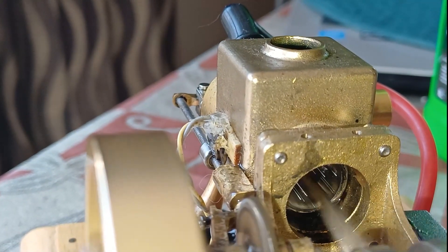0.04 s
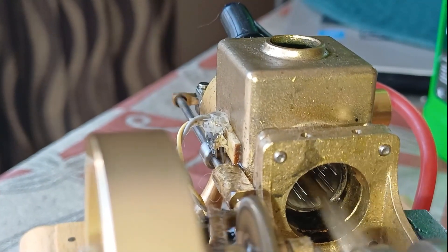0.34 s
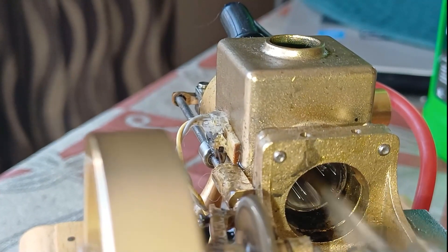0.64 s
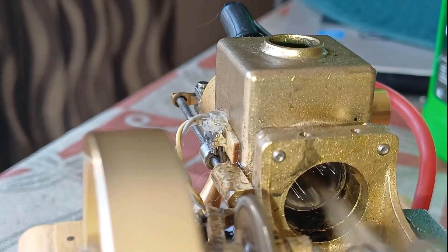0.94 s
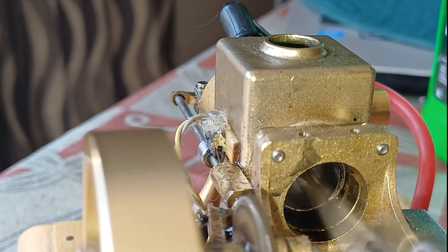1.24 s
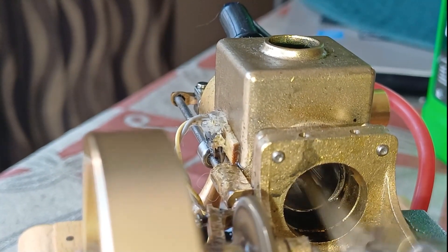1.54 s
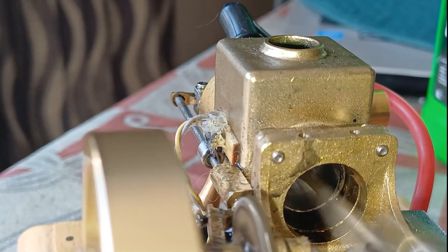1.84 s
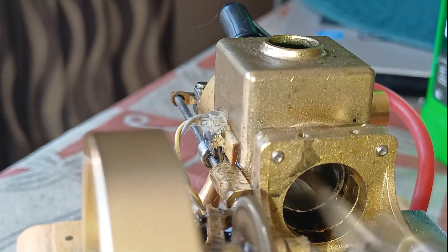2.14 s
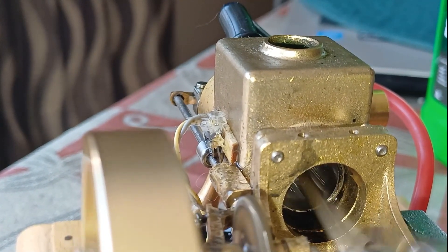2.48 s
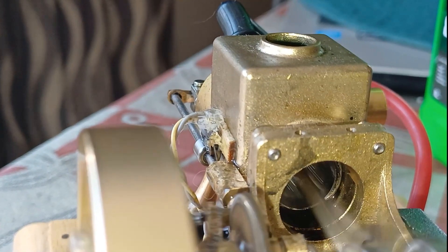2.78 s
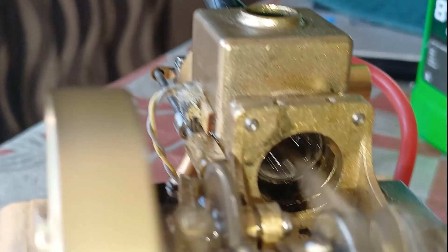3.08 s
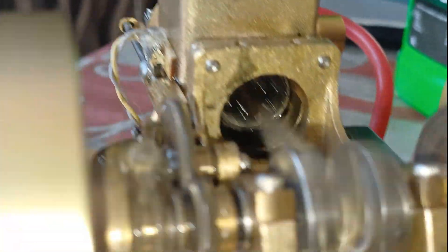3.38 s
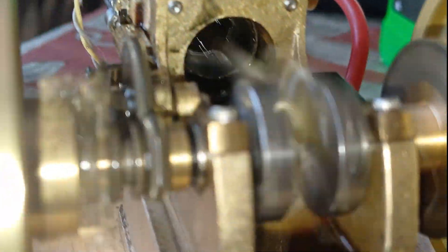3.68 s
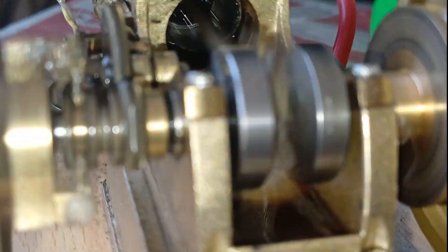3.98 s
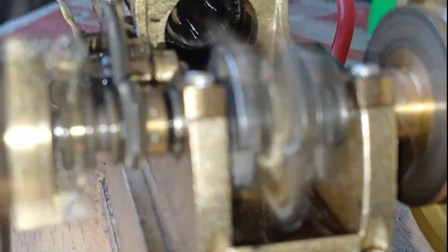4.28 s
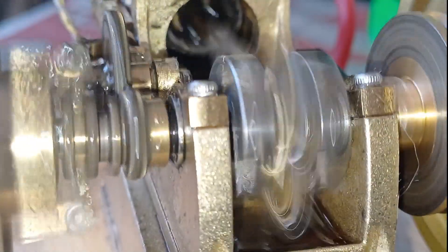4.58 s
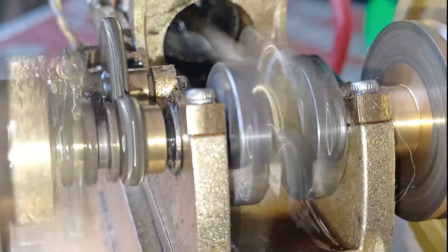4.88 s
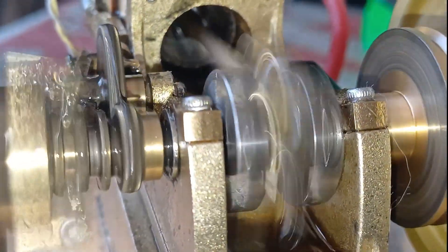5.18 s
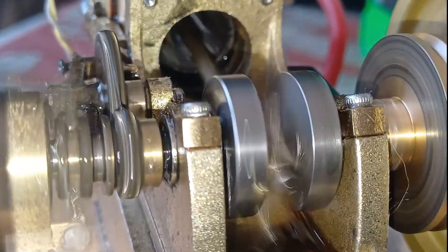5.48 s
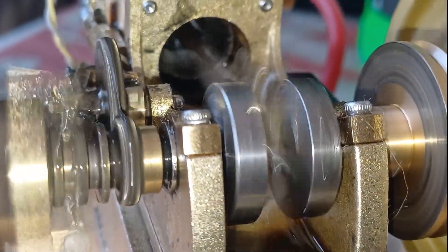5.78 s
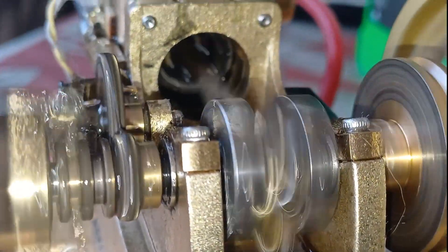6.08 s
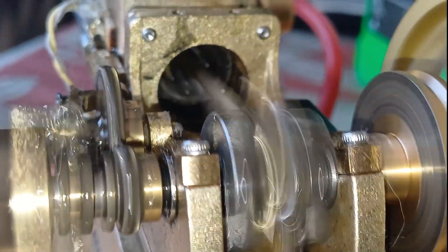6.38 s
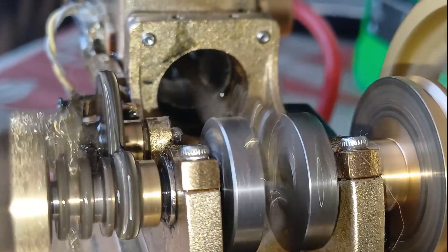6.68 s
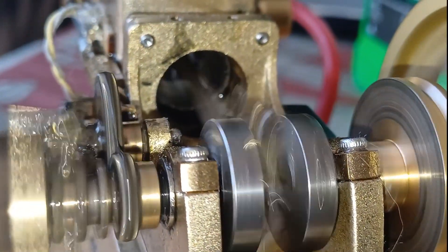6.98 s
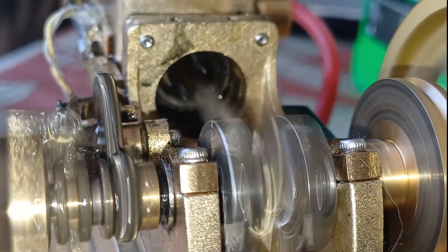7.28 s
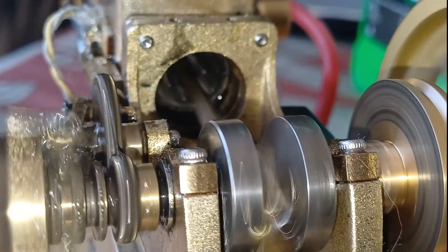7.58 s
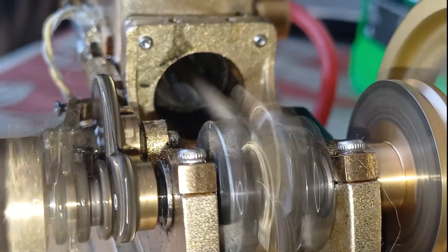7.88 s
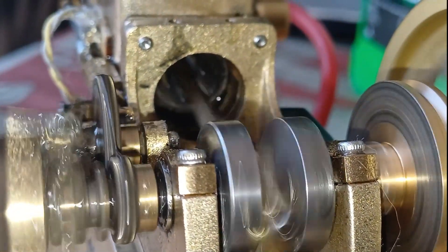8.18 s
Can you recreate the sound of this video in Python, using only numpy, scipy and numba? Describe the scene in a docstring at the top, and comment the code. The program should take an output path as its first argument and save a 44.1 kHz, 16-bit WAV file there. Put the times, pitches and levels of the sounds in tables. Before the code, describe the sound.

Sharp exhaust pops, each a thump with a hissy edge, come from a small model engine at slightly uneven gaps of about half a second. A tiny fluttering snort comes just before each one. Quick ticking, light metal knocking and a pulsing hiss fill the gaps, easing as the flywheel slows. The engine keeps this up throughout, heard very close in a small room with faint background air and one soft passing rush.

```python
"""A small room: a little brass hit-and-miss engine runs on a table, a hand's width away.
It fires once every five to seven four-stroke cycles. In between it coasts and slows: the piston hisses,
the cylinder hums, the rod knocks, the pushrod clicks on its latch. Then the exhaust valve shuts, the
intake valve snores, and one charge lights and pops out of the muffler.
Faint room air lies underneath; a soft rush swells and fades once."""
import sys
import numpy as np
from scipy import signal
from scipy.fft import rfft, irfft, next_fast_len
from scipy.io import wavfile
from numba import njit

SR = 44100
rng = np.random.default_rng(int(sys.argv[2]) if len(sys.argv) > 2 else 0)


def to_wav(s):
    """Save 16-bit WAV."""
    ch = np.atleast_2d(s).T  # columns
    pcm = np.round(np.clip(ch, -1, 1) * 32767)  # PCM
    wavfile.write(sys.argv[1], SR, pcm.astype(np.int16))


N = 367779
TIME = np.arange(N) / SR
SOFT_TAP_PHASE, SHUT_PHASE, TOP_CENTRE_PHASE = .077, .23, .3  # cycles after the exhaust opens
IGNITION_SHARE, PUSH_SHARE = .755, .9  # of the lead: the time from exhaust valve shut to pop


def undb(db):
    """Decibels to gain."""
    return 10 ** (np.asarray(db) / 20)


def unit(x):
    """Scale to rms 1."""
    return x / np.sqrt(np.mean(x ** 2))


def unit_hit(x):
    """Scale to the energy of 5 ms at rms 1."""
    return x / np.sqrt(np.mean(np.sum(x ** 2, axis=-1)) / (.005 * SR))


def bin_gains(points, size):
    """FFT bin gains of a (Hz, dB) curve."""
    hz, db = np.transpose(points)
    return undb(np.interp(np.log(np.fft.rfftfreq(size, 1 / SR) + 1), np.log(hz), db))


def colour(x, points, size=2048):
    """Minimum-phase filter with a (Hz, dB) curve."""
    cepstrum = irfft(np.log(bin_gains(points, size)))
    cepstrum[1:size // 2] *= 2
    cepstrum[size // 2 + 1:] = 0
    response = irfft(np.exp(rfft(cepstrum)))
    return signal.oaconvolve(np.atleast_2d(x), response[None], axes=1)[:, :x.shape[-1]]


def ring(x, response):
    """Convolve with an impulse response."""
    return signal.oaconvolve(np.atleast_2d(x), np.atleast_2d(response), axes=1)[:, :N]


def fade(t60_s, count=4096):
    """Exponential decay."""
    return undb(-60 * np.arange(count) / SR / t60_s)


def burst(t60_s, count=4096):
    """Decaying noise."""
    return rng.standard_normal(count) * fade(t60_s, count)


def modes(table, count=2048):
    """Decaying sines from (Hz, t60 s, dB) rows."""
    t = np.arange(count) / SR
    return sum(undb(db) * np.sin(2 * np.pi * hz * t) * fade(t60_s, count) for hz, t60_s, db in table)


def place(times_s, levels_db, sound):
    """A fresh sound() at each time; one level for all, or one each."""
    out = np.zeros(N)
    for at_s, db in zip(times_s, np.broadcast_to(levels_db, len(times_s))):
        start = int(at_s * SR)
        if 0 <= start < N:
            piece = sound()[:N - start]
            out[start:start + len(piece)] += undb(db) * piece
    return out


def contact(t60_s, chatter):
    """One impact, then brief surface chatter; energy 1."""
    force = chatter * burst(t60_s, 512)
    force[0] += 1
    return force / np.sqrt(np.sum(force ** 2))


@njit
def bandpass(x, hz, width_hz):
    """State-variable band-pass with a moving centre."""
    out, band_state, low_state = np.empty(len(x)), 0., 0.
    for i in range(len(x)):
        gain, damping = np.tan(np.pi * hz[i] / SR), width_hz / hz[i]
        band = (band_state + gain * (x[i] - low_state)) / (1 + gain * (gain + damping))
        band_state = 2 * band - band_state
        low_state += 2 * gain * band
        out[i] = damping * band
    return out


# Stereo balance of the engine. Each row: frequency in Hz, left minus right in dB.
BALANCE = [(200, 0.5), (750, -3.5), (1300, -2.5), (2500, 8), (4200, 1.5), (5800, -8), (8000, 4),
           (11000, 6.5), (15000, 7.5)]
def stereo(x, lag_s=0.00012):
    """The channels face different sides of the engine; left is nearer."""
    count = x.shape[-1]
    size = 2 * next_fast_len(count // 2 + 1024, True)
    side = np.sqrt(bin_gains(BALANCE, size))
    delay = np.exp(-2j * np.pi * np.fft.rfftfreq(size, 1 / SR) * lag_s)
    return irfft(rfft(x, size) * np.array([side, delay / side]), size)[:, :count]


def crank(cycle_s=.096, pop_before_s=-.345, pop_after_s=8.717):
    """Phase in four-stroke cycles: each firing speeds the flywheel up, then it slows until the next."""
    pop_s, lead_s, slowing_pct = np.transpose(FIRINGS)[:3]
    pop_s = np.r_[pop_before_s, pop_s, pop_after_s]
    lead_s = np.r_[lead_s, lead_s.mean()]
    slowing = np.r_[slowing_pct.mean(), slowing_pct] / 100
    times, phases, done = [], [], 0
    for start, end, lead, rate in zip(pop_s, pop_s[1:], lead_s, slowing):
        cycles = round((end - start) / cycle_s)
        coast = np.linspace(0, cycles - 1 + SHUT_PHASE, 200)
        times.append(start + (end - lead - start) * np.expm1(rate * coast) / np.expm1(rate * coast[-1]))
        phases.append(done + coast)
        done += cycles
    return np.interp(TIME, np.concatenate(times), np.concatenate(phases))


def when(phase, targets):
    """Seconds at which the crank reaches each target phase; -1 if never."""
    return np.interp(targets, phase, TIME, left=-1, right=-1)


# Spectra of the room air and the rush. Each row: frequency in Hz, level in dB.
AIR_SPECTRUM = [(20, -40), (50, -7.5), (110, -2.5), (300, -10), (450, -22), (1500, -23), (8000, -53)]
RUSH_SPECTRUM = [(70, -17), (130, -9), (330, 2), (550, -1), (780, 5), (1150, -10), (1550, -6), (1920, 2.5),
                 (2500, -10), (16000, -31)]
def room_air(air_db=-64.5, rush_db=-39.5, peak_s=3.705, rise_s=0.68, fall_s=0.27, floor_db=-19.5):
    """Faint low air; a soft rush swells, then sinks to a floor."""
    air, rush = (rng.standard_normal(N) + .5 * rng.standard_normal((2, N)) for _ in range(2))
    late_s = TIME - peak_s
    swell = np.exp(-(late_s / np.where(late_s < 0, rise_s, fall_s)) ** 2)
    swell = np.maximum(swell, undb(floor_db) * (late_s > 0))
    air = undb(air_db) * unit(colour(air, AIR_SPECTRUM))
    return air + undb(rush_db) * swell * unit(colour(rush, RUSH_SPECTRUM))


# Sliding metal. Each row: frequency in Hz, level in dB.
SLIDE_SPECTRUM = [(200, -48), (480, -27), (1100, 4), (1420, 6.5), (2100, -2), (3200, -4.5), (4800, -3),
                  (5700, 3), (7500, -11), (9800, -26), (10700, -9.5), (11600, -9.5), (16000, -20)]
def sliding(phase, stroke_db=4, cam_db=4, speed_db=20):
    """Piston and gears hiss: more at mid-stroke, at speed, and in the half cycle after the cam lifts."""
    speed = np.gradient(phase) / np.mean(np.gradient(phase))
    stroke = np.abs(np.sin(4 * np.pi * (phase - TOP_CENTRE_PHASE)))
    cam = np.cos(2 * np.pi * (phase - .25))
    hiss = unit(stereo(colour(rng.standard_normal((2, N)), SLIDE_SPECTRUM)))
    return hiss * undb(-49 + stroke_db * stroke + cam_db * cam + speed_db * (speed - 1))


def cylinder(phase, tap_s, tap_db, shut_s, centre_hz=865, swing_hz=55, width_hz=170., gulp_hz=680.):
    """Pumped air hums in a cavity whose pitch follows the piston; valve taps ping it."""
    pitch_hz = centre_hz + swing_hz * np.sin(4 * np.pi * (phase - 0.022))
    hum = bandpass(bandpass(rng.standard_normal(N), pitch_hz, width_hz), pitch_hz, 2 * width_hz)
    passband = signal.butter(4, [600, 1030], "band", fs=SR, output="sos")
    hum = unit(signal.sosfilt(passband, hum))
    at_bottom = np.exp(-(np.cos(2 * np.pi * (phase - TOP_CENTRE_PHASE)) / 0.33) ** 2)
    gulp = bandpass(at_bottom * rng.standard_normal(N), np.full(N, gulp_hz), width_hz=155.)
    gulp = unit(signal.sosfilt(passband, gulp))
    t = np.arange(4096) / SR
    ping_hz = centre_hz + 110 * fade(0.038)
    ping_envelope = fade(0.031) * (1 - np.exp(-t / 0.011))
    ping = unit_hit(np.sin(2 * np.pi * np.cumsum(ping_hz) / SR) * ping_envelope)
    pings = place(tap_s, tap_db - 3.5, lambda: ping) + place(shut_s, -35, lambda: ping)
    return stereo(np.array([undb(-45) * hum + undb(-52) * gulp + pings] * 2))


def ring_scuff(phase, centre_hz=3000, rise_hz=700, level_db=-42.5, span_cycles=0.081):
    """The piston ring drags through top dead centre with a short rising scuff."""
    from_top = ((2 * (phase - TOP_CENTRE_PHASE) + .5) % 1 - .5) / 2 / span_cycles
    pitch_hz = centre_hz + rise_hz * np.clip(from_top, -2, 2)
    scuff = np.array([unit(bandpass(bandpass(noise, pitch_hz, 3700.), pitch_hz, 5900.))
                      for noise in rng.standard_normal((2, N))])
    return scuff * np.exp(-from_top ** 2) * undb(level_db + np.array([[2], [-2]]))


# Brass frame modes. Each row: frequency in Hz, t60 in seconds, level in dB.
BRASS_MODES = [(1424, 0.026, -5), (5790, 0.033, -10)]
def metal(spectrum, t60_s, tail_t60_s, tail_db):
    """Stereo response of a struck part: crack, dense modes, ring of the frame."""
    dense = np.array([burst(t60_s) + undb(tail_db) * burst(tail_t60_s) for _ in range(2)])
    dense /= np.sqrt(np.sum(dense ** 2, axis=1, keepdims=True))
    dense[:, 0] += .9  # crack
    t = np.arange(dense.shape[1]) / SR
    frame = sum(undb(db) * np.cos(2 * np.pi * hz * t - rng.uniform(0, 1, (2, 1))) * fade(decay_s)
                for hz, decay_s, db in BRASS_MODES)
    return unit_hit(stereo(unit_hit(colour(dense, spectrum)) + frame))


# Play in the connecting rod. Each row: turns after top dead centre, level in dB, chatter, cutoff in Hz.
ROD_KNOCKS = [(0, -34.5, 0.18, 4320), (.047, -34.5, 0.3, 15800), (0.487, -35, .17, 3200)]
# Knocked metal. Each row: frequency in Hz, level in dB.
KNOCK_SPECTRUM = [(300, -43), (600, -30), (1120, -4.5), (1420, 6), (2000, -2.5), (3000, 0.5), (4200, 3.5),
                  (5000, -5), (8000, -5.5), (10500, -6), (12700, 0), (16000, -8)]
def rod_knocks(phase, shut_s, lead_s, push_db=-33, jitter_s=.0002, scatter_db=0.1):
    """The rod ends knock as the piston reverses; compression mutes them until the charge pushes back."""
    turns = np.arange(2 * np.floor(phase[0]), 2 * phase[-1])
    compressed_phase = np.floor(np.interp(shut_s, TIME, phase)) + TOP_CENTRE_PHASE + .5
    pushes = place(shut_s + PUSH_SHARE * lead_s, push_db, lambda: contact(t60_s=0.0064, chatter=0.45))
    out = ring(pushes, metal(KNOCK_SPECTRUM, t60_s=0.0045, tail_t60_s=0.05, tail_db=-16))
    for share, db, chatter, cutoff_hz in ROD_KNOCKS:
        knock_phase = TOP_CENTRE_PHASE + (turns + share) / 2
        loose = np.abs(knock_phase[:, None] - compressed_phase).min(axis=1) > .1
        chance = rng.standard_normal((loose.sum(), 2))
        knock_s = when(phase, knock_phase[loose]) + jitter_s * chance[:, 0]
        knocks = place(knock_s, db + scatter_db * chance[:, 1], lambda: contact(0.0055, chatter))
        knocks = signal.sosfilt(signal.butter(2, cutoff_hz, fs=SR, output="sos"), knocks)
        out += ring(knocks, metal(KNOCK_SPECTRUM, t60_s=0.004, tail_t60_s=0.045, tail_db=-15))
    return out


# Hard pushrod taps in the fast cycles after a firing. Each row: start in seconds, level in dB.
HARD_LATCH_TAPS = [(.4093, -27), (.4967, -27.5), (.5908, -31.5), (.686, -31), (1.0699, -27.5),
                   (1.1601, -27.5), (1.2572, -32.5), (1.7575, -24), (2.3503, -25.5), (2.8324, -26.5),
                   (2.9261, -30), (3.4018, -28.5), (3.4896, -26), (4.0727, -28), (4.6416, -28),
                   (4.7316, -28), (5.2134, -27), (5.3026, -28.5), (5.7801, -27.5), (5.8686, -29.5),
                   (6.4508, -27), (7.0268, -27.5), (7.594, -28), (7.6823, -29.5), (8.1511, -27.5),
                   (8.2367, -27)]
def latch_taps(phase, soft_db=-35):
    """The cam taps the latched pushrod once per coasting cycle, hard then soft. Returns seconds, dB."""
    hard_s, hard_db = np.transpose(HARD_LATCH_TAPS)
    pop_s = np.transpose(FIRINGS)[0]
    taken_cycles = np.round(np.interp(np.r_[pop_s, hard_s], TIME, phase))
    free_cycles = np.setdiff1d(np.arange(np.ceil(phase[0]), phase[-1]), taken_cycles)
    soft_s = when(phase, free_cycles + SOFT_TAP_PHASE)
    return np.r_[hard_s, soft_s], np.r_[hard_db, np.full(len(soft_s), soft_db)]


# Valve clicks. Each row: frequency in Hz, level in dB.
CLICK_SPECTRUM = [(60, -41), (500, -3), (1100, -15), (1400, 6.5), (2000, 2.5), (2700, 1), (4200, 3),
                  (6200, 2.5), (8500, -8.5), (12500, -5), (16000, -13.5)]
def valve_gear(tap_s, tap_db, shut_s, seat_db=-27.5):
    """The pushrod clicks on its latch; the released exhaust valve snaps onto its seat."""
    taps = place(tap_s, tap_db, lambda: contact(t60_s=0.014, chatter=0.39))
    seats = place(shut_s, seat_db, lambda: contact(t60_s=0.0084, chatter=0.065))
    return ring(taps + seats, metal(CLICK_SPECTRUM, t60_s=0.0055, tail_t60_s=0.05, tail_db=-17.5))


# Intake valve flaps. Each row: seconds after the exhaust valve shuts, air in dB, rasp in dB.
VALVE_FLAPS = [(.0139, -24, -37), (.0200, -25, -31.5), (.0263, -25, -31.5), (.0318, -31.5, -39.5)]
# Intake air. Each row: frequency in Hz, level in dB.
SNORE_SPECTRUM = [(80, -31), (160, -2), (480, 1.5), (750, -1.5), (1150, -17.5), (1600, -3), (2150, -16),
                  (2800, -34), (8000, -10), (16000, -15.5)]
# Intake passage modes. Each row: frequency in Hz, t60 in seconds, level in dB.
INTAKE_MODES = [(1663, 0.047, 0), (2040, 0.008, -10), (2110, 0.018, 8.5)]
def intake(shut_s, push_s=0.00015, thud_db=-4, gasp_db=-7, tick_db=-32.5, lift_db=-28, lift_s=0.0094):
    """The sprung valve clicks open and flutters; each flap thuds, gasps, ticks and rings the passage."""
    delay_s, air_db, rasp_db = np.tile(VALVE_FLAPS, (len(shut_s), 1)).T
    jitter, scatter_db = rng.standard_normal((len(delay_s), 2)).T
    flap_s = np.repeat(shut_s, len(VALVE_FLAPS)) + delay_s + 0.0006 * jitter
    t = np.arange(2048) / SR
    thud = unit_hit(colour(np.exp(-(t / push_s - 2) ** 2), SNORE_SPECTRUM))[0]
    thuds = place(flap_s - 2 * push_s, air_db + thud_db + scatter_db, lambda: -thud)
    gasp = lambda: unit_hit(colour(burst(0.022, 2048), SNORE_SPECTRUM))[0]
    gasps = place(flap_s, air_db + gasp_db, gasp)
    rasp = lambda: unit_hit(signal.fftconvolve(modes(INTAKE_MODES), contact(t60_s=0.0077, chatter=0.33)))
    rasps = place(flap_s, rasp_db + scatter_db, rasp)
    ticks = place(flap_s, tick_db, lambda: contact(t60_s=0.029, chatter=1.0))
    lifts = place(shut_s + lift_s, lift_db, lambda: contact(t60_s=0.0024, chatter=0.058))
    clicks = ring(ticks + lifts, metal(CLICK_SPECTRUM, t60_s=0.004, tail_t60_s=0.04, tail_db=-9.5))
    return stereo(np.array([thuds + gasps + rasps] * 2)) + clicks


def compression(ignition_s, width_s=.022):
    """Cylinder pressure, 0 to 1, peaking at ignition."""
    return sum(np.exp(-((TIME - peak_s) / width_s) ** 2) for peak_s in ignition_s)


def blow_by(pressure, leak_db=-47):
    """Some of the squeezed charge hisses past the piston."""
    return undb(leak_db) * pressure * unit(stereo(colour(rng.standard_normal((2, N)), KNOCK_SPECTRUM)))


def ignition(ignition_s, blip_hz=780, width_s=0.0012):
    """The charge lights near top dead centre with a dull blip."""
    t = np.arange(512) / SR - 2 * width_s
    blip = np.sin(2 * np.pi * blip_hz * t) * np.exp(-(t / width_s) ** 2)
    ignition_db = np.transpose(FIRINGS)[-1]
    return place(ignition_s - 2 * width_s, ignition_db, lambda: blip)


# Fired charges. Each row: pop in seconds, lead in seconds, slowing afterwards in % per cycle,
# then thump, jet, outlet tube, whistle and ignition levels in dB.
FIRINGS = [(.3215, .08, 3.55, -10, -18.5, -29, -19, -26), (.9797, .08, 3.85, -9.5, -21, -25, -23, -26.5),
           (1.6628, 0.085, 3.7, -8.5, -17.5, -33, -20.5, -21),
           (2.256, 0.085, 3.85, -9, -18, -30, -22.5, -22), (2.7404, .081, 3.25, -9, -20, -25, -20.5, -20.5),
           (3.3125, 0.081, 3.95, -8.5, -16, -23, -19, -20),
           (3.9804, 0.084, 3.25, -12.5, -18.5, -28, -23.5, -18.5),
           (4.5516, 0.08, 3.95, -13, -22.5, -25, -21.5, -26),
           (5.124, .082, 4.05, -13, -17.5, -30, -25, -27),
           (5.6921, .0792, 3.75, -10.5, -16, -22.5, -28, -23),
           (6.3585, .083, 3.4, -10.5, -19.5, -28, -20, -20), (6.935, .0805, 3.2, -13, -21.5, -28, -18, -18),
           (7.505, .079, 3.7, -11, -16.5, -27.5, -22, -26), (8.0643, .079, 3.7, -10, -18.5, -24, -22, -22)]
# Muffler thump, gas jet and valve gap whistle. Each row: frequency in Hz, level in dB.
THUMP_SPECTRUM = [(20, -28), (42, -21.5), (72, -7.5), (105, 0.5), (170, -3), (250, -2), (400, -2),
                  (560, 1.5), (730, 5), (900, -1), (1300, -27), (3000, -17)]
JET_SPECTRUM = [(60, -3), (800, -1), (1900, -19), (2480, -13), (2900, -5.5), (3500, -5), (4400, -6.5),
                (5700, -2.5), (7300, -8), (9500, -1), (12500, -6.5), (14000, -9), (16000, 1)]
WHISTLE_SPECTRUM = [(6500, -21), (8300, -10), (9200, -12), (10100, -6), (10700, -2.5), (11250, 1.5),
                    (11800, -3), (12900, -15), (16000, -51)]
# Outlet tube modes. Each row: frequency in Hz, t60 in seconds, level in dB.
OUTLET_MODES = [(2460, 0.012, 2), (3920, 0.012, -11)]
def exhaust(swell_s=0.00098, peak_s=0.00287, stop_s=0.0007,
            muffler_hz=700, muffler_t60_s=0.014, muffler_db=-8.5, jet_pan_db=4, recoil_db=-21):
    """A gas puff rings muffler and tube; the valve gap hisses and whistles; recoil rings the frame."""
    pop_s, _, _, thump_db, jet_db, tube_db, whistle_db, _ = np.transpose(FIRINGS)
    t = np.arange(4096) / SR
    late_s = t - peak_s
    flow = np.exp(-(late_s / np.where(late_s < 0, swell_s, stop_s)) ** 2)
    pressure = -np.gradient(flow)
    crack = 0.34 * np.exp(-((t - .0005) / 0.00037) ** 2)  # small push as the valve opens
    muffler_decay = undb(-60 * np.abs(late_s) / muffler_t60_s) * (late_s > 0)
    muffler = undb(muffler_db) * np.sin(2 * np.pi * muffler_hz * late_s) * muffler_decay
    thump = unit_hit(colour(crack + pressure / pressure.max() + muffler, THUMP_SPECTRUM))[0]
    thumps = place(pop_s, thump_db, lambda: thump)
    gap = np.exp(-((t - .0017) / 0.00092) ** 2) + undb(-20.5) * fade(0.12)

    def tube_ring():
        """Gas noise rings the outlet tube."""
        return unit_hit(signal.fftconvolve(gap * rng.standard_normal(len(t)), modes(OUTLET_MODES)))

    def gap_noise(spectrum):
        """Gas noise, a little higher or lower each puff."""
        noise = gap * rng.standard_normal(len(t))
        detune = np.exp(0.025 * rng.standard_normal())
        return unit_hit(colour(noise, np.array(spectrum) * [detune, 1]))[0]

    jets = np.array([place(pop_s, tube_db, tube_ring) for _ in range(2)])
    for db, spectrum in ((jet_db, JET_SPECTRUM), (whistle_db, WHISTLE_SPECTRUM)):
        jets += np.array([place(pop_s, db, lambda: gap_noise(spectrum)) for _ in range(2)])
    recoil = place(pop_s + peak_s, thump_db + recoil_db, lambda: unit_hit(modes(BRASS_MODES)))
    return stereo(np.array([thumps + recoil] * 2)) + jets * undb([[jet_pan_db], [-jet_pan_db]])


# Low room modes. Each row: frequency in Hz, t60 in seconds, level in dB.
BOOM_MODES = [(51.6, 0.63, -62), (144.5, 0.24, -56.5), (216, 0.17, -53), (271.3, 0.16, -59),
              (349.4, 0.19, -63.5)]
def room(x, t60_s=0.38, wet_db=-19, predelay_s=.007, count=22050):
    """Dull scattered echoes and a few low modes."""
    t = np.arange(count) / SR
    echoes = np.array([burst(t60_s, count), burst(t60_s, count)]) * 1.4 + burst(t60_s, count)
    echo_spectrum = [(100, 2.5), (280, -2.5), (600, -1.5), (2000, -1.5), (12000, -7.5)]
    echoes = colour(echoes * (t > predelay_s), echo_spectrum)
    boom = sum(undb(db) * np.cos(2 * np.pi * hz * t) * fade(decay_s, count)
               for hz, decay_s, db in BOOM_MODES)
    return ring(x, undb(wet_db) * echoes / np.sqrt(np.sum(echoes[0] ** 2)) + boom)


# The microphone backs away from the cylinder. Each row: time in seconds, piston noise gain in dB.
PISTON_GAIN = [(3, 1), (4, -0.5)]
def scene():
    """Firing times and one crank phase drive all engine parts."""
    phase = crank()
    pop_s, lead_s = np.transpose(FIRINGS)[:2]
    shut_s = pop_s - lead_s  # the governor releases the exhaust valve just before the intake stroke
    ignition_s = shut_s + IGNITION_SHARE * lead_s
    tap_s, tap_db = latch_taps(phase)
    pressure = compression(ignition_s)
    piston = rod_knocks(phase, shut_s, lead_s) + (1 - pressure) * ring_scuff(phase)
    piston += blow_by(pressure) + sliding(phase)
    piston *= undb(np.interp(TIME, *np.transpose(PISTON_GAIN)))
    firing = exhaust() + intake(shut_s) + ignition(ignition_s)
    engine = firing + valve_gear(tap_s, tap_db, shut_s) + cylinder(phase, tap_s, tap_db, shut_s) + piston
    return engine + room(engine) + room_air()


def record(dry):
    """Clip at full scale, low-pass at 16.2 kHz."""
    return signal.sosfilt(signal.ellip(8, .2, 70, 16200, fs=SR, output="sos"), np.clip(dry, -1, 1))


dry = scene()
out = record(dry)
to_wav(out)
```